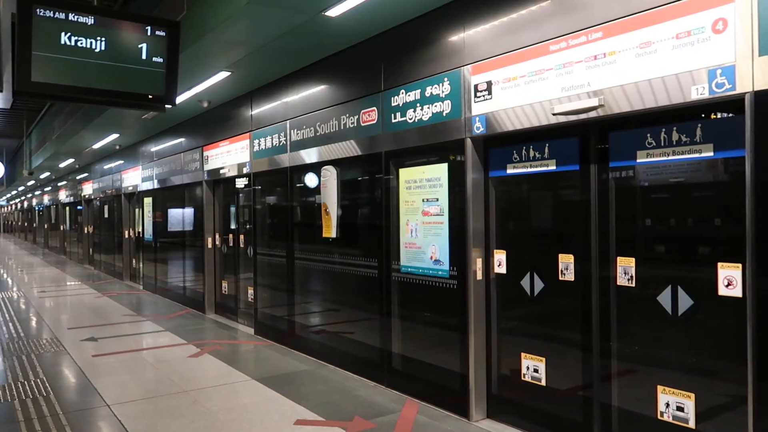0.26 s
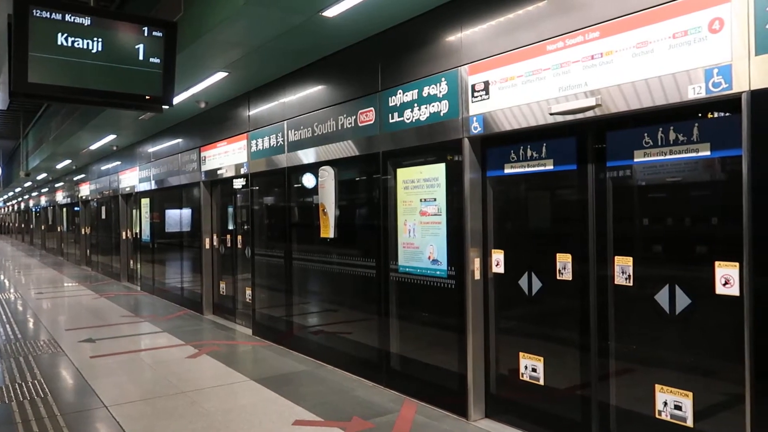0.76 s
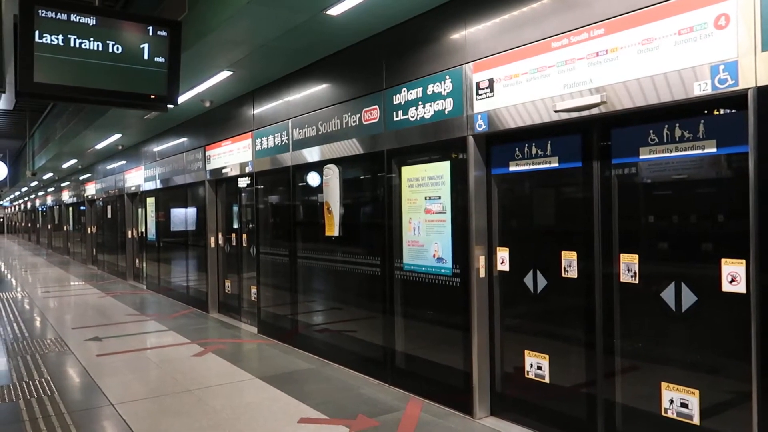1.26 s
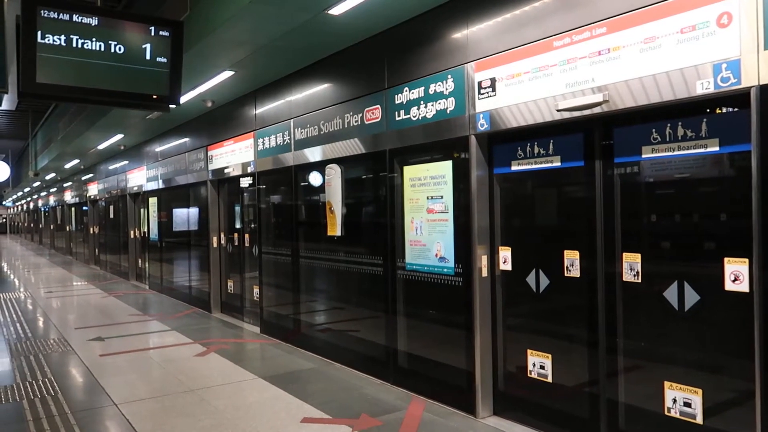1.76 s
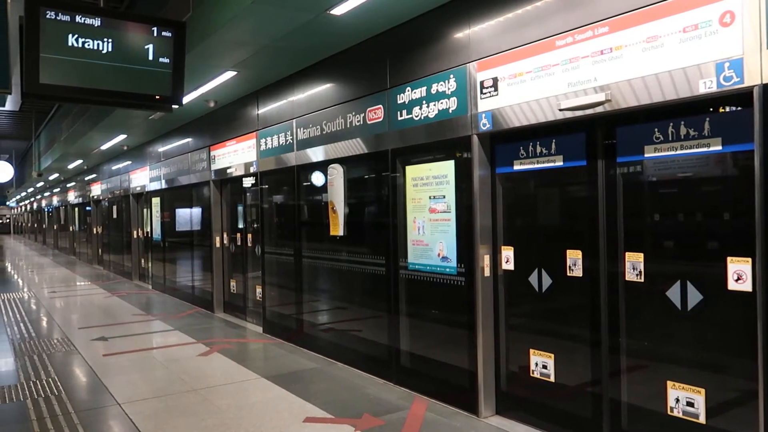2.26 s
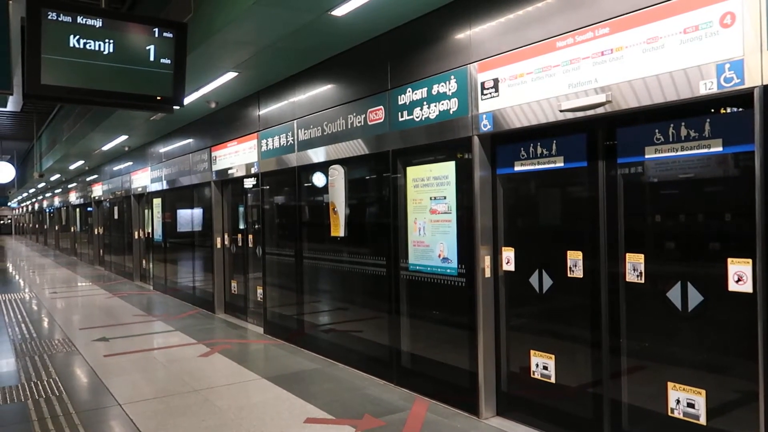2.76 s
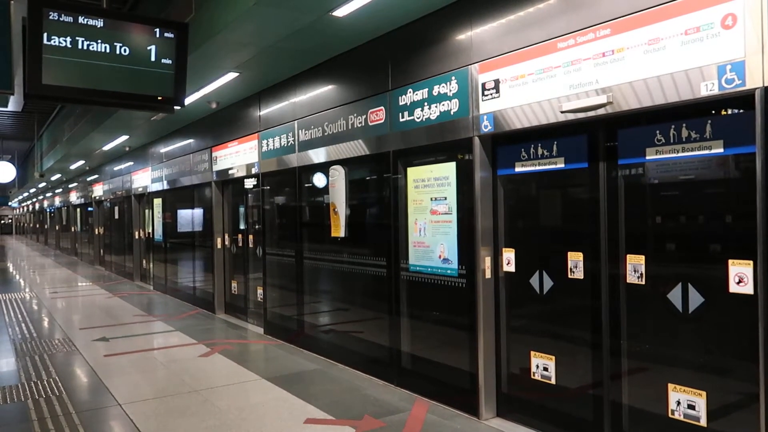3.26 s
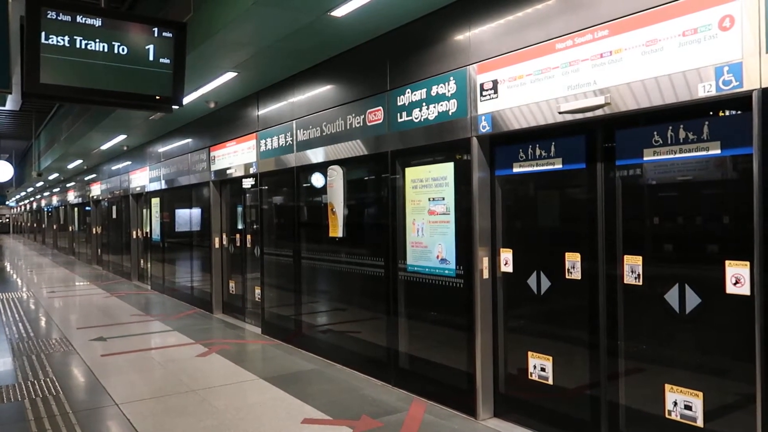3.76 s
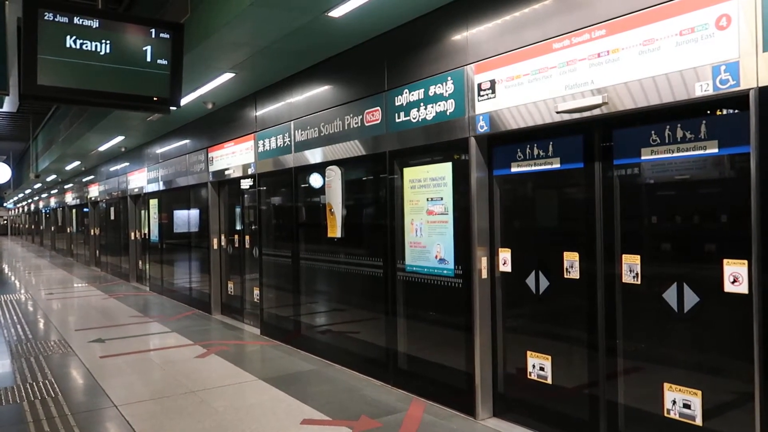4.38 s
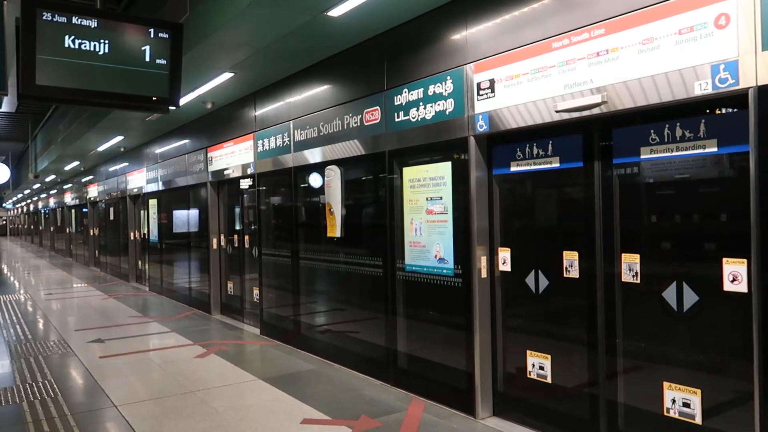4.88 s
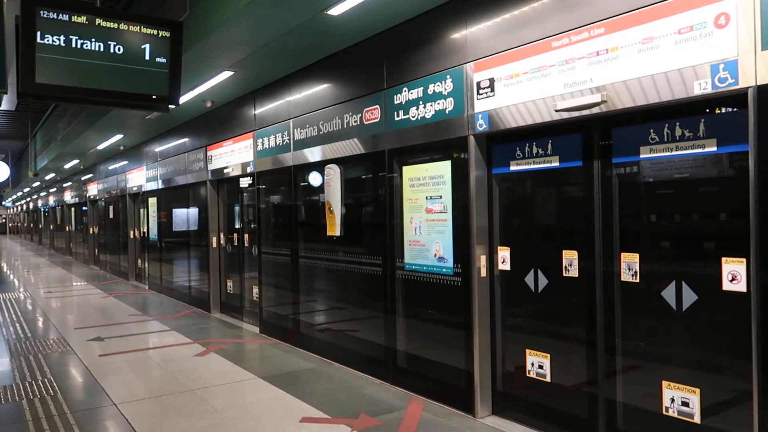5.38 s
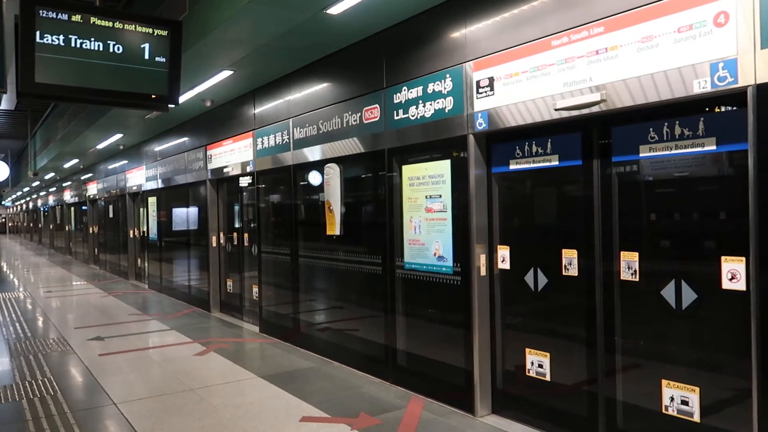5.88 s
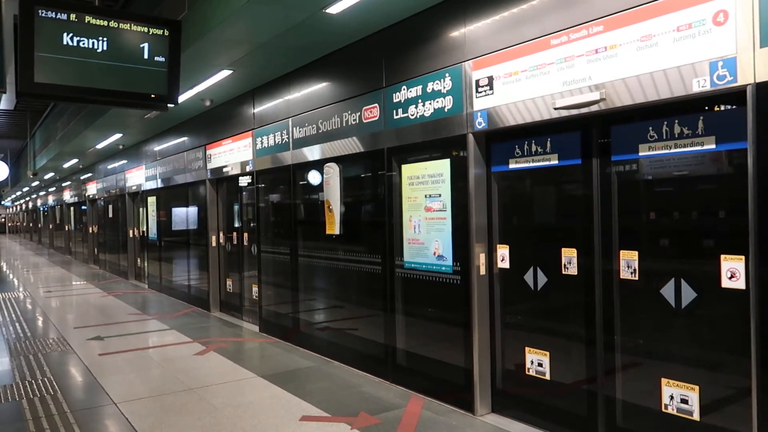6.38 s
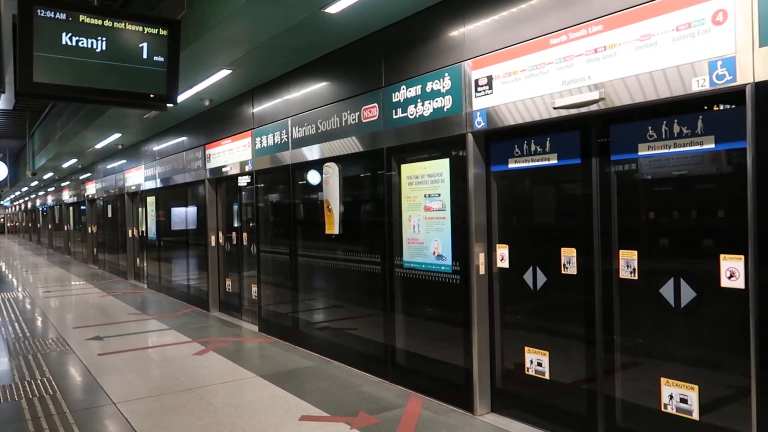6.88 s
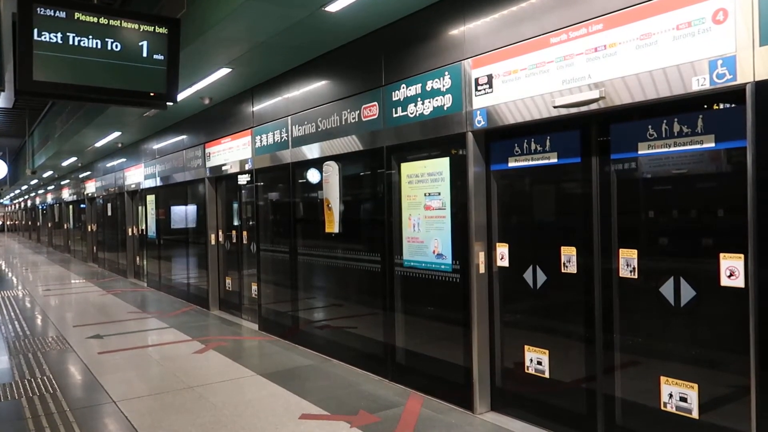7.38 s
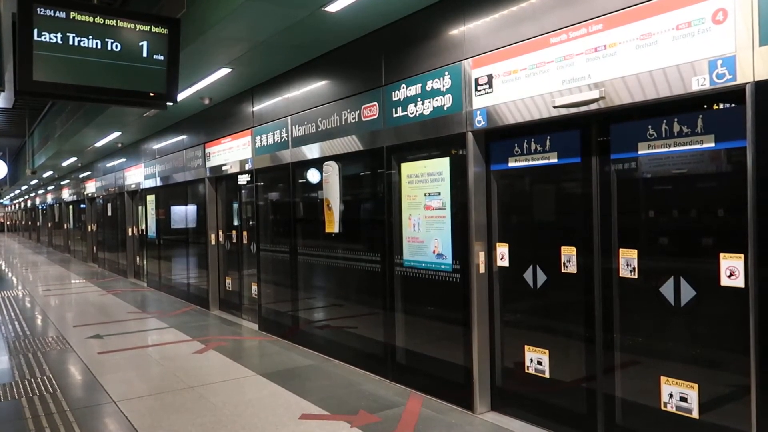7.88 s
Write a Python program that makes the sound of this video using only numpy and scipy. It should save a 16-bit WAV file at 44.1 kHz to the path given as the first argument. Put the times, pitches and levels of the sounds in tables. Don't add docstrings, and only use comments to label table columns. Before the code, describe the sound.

Low ventilation drone and soft hiss in a deserted subway station, while bass rumble from a far-off train swells and stays stronger.

```python
import sys
import numpy as np
from scipy import signal
from scipy.fft import rfft, irfft
from scipy.io import wavfile
from scipy.ndimage import uniform_filter1d

SR = 44100
rng = np.random.default_rng(int(sys.argv[2]) if len(sys.argv) > 2 else 0)


def wav_record(signal):
    frames = np.transpose(np.atleast_2d(signal))
    bounded = np.clip(frames, -1, 1)
    quanta = np.round(bounded * 32767).astype(np.int16)
    wavfile.write(sys.argv[1], SR, quanta)


def gain_from_db(level_db):
    decades = np.asarray(level_db, float) / 20
    return 10 ** decades


N = 358952
TIME = np.arange(N) / SR
HZ = np.maximum(np.fft.rfftfreq(N, 1 / SR), 1)


def level(x, db):
    return x * gain_from_db(db) / np.sqrt(np.mean(x ** 2))


def along(table, column=1):
    table = np.array(table)
    return np.interp(np.log(HZ), np.log(table[:, 0]), table[:, column])


def colour(spectrum, peaks=()):
    db = along(spectrum)
    for hz, width, lift in peaks:
        db = db + lift / (1 + (2 * (HZ - hz) / width) ** 2)
    return gain_from_db(db) * (HZ > spectrum[0][0]) * (HZ < spectrum[-1][0])


def white():
    return rfft(rng.standard_normal(N))


def bump(centre_s, length_s):
    return np.exp(-((TIME - centre_s) / length_s) ** 2)


def walk(rate):
    hold = int(SR / rate)
    steps = np.repeat(rng.standard_normal(N // hold + 1), hold)
    return 1.33 * uniform_filter1d(uniform_filter1d(steps, hold), hold)[:N]


def fans():
    # [(multiple, mid level/dB, side level/dB)]
    blades = [(353.55, .12, [(1, -50, -65), (2, -48.5, -75), (3, -59, -73)]), (356.94, .04, [(1, -50, -60),
              (2, -49, -84), (3, -54, -76), (4, -62, -86)]), (370.6, .15, [(1, -37.5, -64), (2, -49, -82)]),
              (376.05, .3, [(2, -51, -87), (3, -58, -74), (4, -64, -75)]), (305.26, .05, [(1, -45, -75)]),
              (459.14, .05, [(1, -51, -73)]), (596.84, .05, [(1, -51, -70)]),
              (11450.3, .3, [(1, -107, -90)])]
    # fan index, t/s, length/s, lift/dB
    passing_peak = (1, .6, .3, 14)
    peak_fan, peak_s, peak_length_s, peak_lift_db = passing_peak
    out = np.zeros((2, N))
    for fan, (blade_hz, wander_hz, tones) in enumerate(blades):
        rotation = 2 * np.pi * np.cumsum(blade_hz + wander_hz * walk(rate=1) / 2) / SR
        for multiple, mid_db, side_db in tones:
            phase = multiple * rotation + 2 * np.pi * rng.random()
            swell = np.sqrt(2) * gain_from_db(walk(rate=2.76))
            if fan == peak_fan and multiple == 1:
                mid_db = mid_db + peak_lift_db * bump(peak_s, peak_length_s)
            mid = gain_from_db(mid_db) * np.sin(phase)
            side = gain_from_db(side_db) * np.sin(phase + .4)
            out += swell * np.array([mid, side])
    return out


def extractor():
    # t/s, length/s, depth/dB
    dips = [(.76, .16, -9), (2.0, .1, -12), (3.52, .14, -16), (5.0, .09, -7), (5.9, .15, -9)]
    hum_hz, hum_db, side_db = 242.29, -30.8, -33
    dip_db = sum(db * bump(s, length) for s, length, db in dips)
    hum = np.sqrt(2) * gain_from_db(hum_db + dip_db) * np.sin(2 * np.pi * hum_hz * TIME)
    return np.array([hum, gain_from_db(side_db) * hum])


def air():
    # f/Hz, density/dB per Hz
    mid_air = [(20, -19), (60, -7.5), (110, -1.5), (300, -6.5), (325, -2.5), (550, -10.5), (1000, -18.5),
               (1600, -23), (2200, -27), (3300, -32), (5000, -43), (7000, -47.5), (9800, -55.5),
               (12000, -64), (13300, -64.3), (14500, -67), (15500, -71.5)]
    # f/Hz, density/dB per Hz
    side_air = [(150, -2), (330, -2), (520, -7), (1350, -9), (2300, -11), (3300, -13.5), (5000, -18.5),
                (7000, -22.5), (10500, -26.5), (12000, -32.5), (13500, -37), (15500, -47)]
    # f/Hz, width/Hz, lift/dB
    ducts = [(657, 34, 1.5), (716, 173, 5.5), (899, 100, 2.5), (1120, 33, -3.5), (1301, 65, 5),
             (1431, 100, 5), (1778, 234, 7), (2244, 130, 3), (2920, 590, 2.5), (3220, 250, 1),
             (4314, 180, 6), (4940, 250, 5), (5400, 170, 4.5), (6700, 260, -0.5), (8450, 570, 3),
             (9440, 570, 3)]
    # f/Hz, width/Hz, lift/dB
    side_ducts = [(610, 80, 3), (1070, 120, 4), (1700, 300, 5), (2750, 300, 2), (4200, 600, 2)]
    # f/Hz, share/0-1, lead/rad
    leftward = [(250, .3, 0.046), (600, .5, .1), (850, .3, .3), (1100, .55, .4), (1350, .4, .55),
                (1750, .7, .7), (2200, .45, .8), (3200, .45, 1.1), (6000, .35, 1.3), (10000, .1, 1.4)]
    common = white()
    share = np.clip(along(leftward), 0, 1)
    following = share * np.exp(1j * along(leftward, column=2)) * common
    apart = following + np.sqrt(1 - share ** 2) * white()
    mid = level(irfft(colour(mid_air, ducts) * common, N), -28.5)
    side = level(irfft(colour(side_air, side_ducts) * apart, N), -49)
    spectrum = rfft(np.array([mid, side]))
    half_octave = 2 * np.log2(HZ / 20)
    out = np.zeros((2, N))
    for band in range(21):
        window = np.clip(1 - np.abs(half_octave - band), 0, 1)
        out += irfft(spectrum * window, N) * gain_from_db(walk(rate=9) / 2)
    return out


def rolling(gain, db):
    even = int(0.35 * SR)
    noise = irfft(gain * white(), N)
    power = uniform_filter1d(uniform_filter1d(noise ** 2, even), even)
    return level(noise / np.sqrt(power), 0) * gain_from_db(db)


def train():
    # f/Hz, density/dB per Hz
    boom = [(25, -20), (40, -11), (55, -6), (68, -4), (80, -10.5), (110, -13), (140, -31)]
    # f/Hz, width/Hz, lift/dB
    boom_mode = [(71.6, 14, 4.5)]
    # f/Hz, density/dB per Hz
    rumble = [(90, -16), (130, -8), (170, -4), (200, 0), (230, -0.5), (250, -9), (290, -24)]
    # f/Hz, density/dB per Hz
    drumming = [(200, -20), (235, -1.5), (260, 0.5), (305, 0), (320, -15), (420, -24.5)]
    # t/s, length/s, boom lift/dB, track bed lift/dB, door lift/dB
    surges = [(.17, 0.15, -1, 3, 1), (1.1, 0.15, 2.5, 0, 3), (1.7, .2, 0, 1.5, -1.5),
              (2.397, .12, -2, 0, 1.5), (2.647, 0.2, 1.5, 4, -1.5), (3.0, .17, 0, 3.5, 1),
              (4.2, .18, 3.5, 2, 2), (4.635, 0.19, -0.5, 7, -0.5), (4.903, .12, 3, 1.5, 2.5),
              (5.35, 0.13, 2, 0, 0), (5.7, 0.22, 1, 2.5, 1.5), (6.053, 0.11, -5, 1.5, 3),
              (6.35, 0.29, 2.5, 5.5, 3), (6.952, 0.093, 0, 3, 0), (7.25, .15, -1, 0, -1.5),
              (7.65, 0.23, 0.5, 3.5, -1.5), (7.947, .15, 3, 1.5, 3.5)]
    nearness = (1 + np.tanh((TIME - 2.53) / 0.46)) / 2
    boom_wave, rumble_wave, drum_wave = sum(np.outer(lifts, bump(s, length)) for s, length, *lifts in surges)
    boom_db = -34 + 3.3 * nearness + boom_wave
    rumble_db = -32.5 + 4.78 * nearness + rumble_wave
    drum_db = -34.5 + 4.4 * nearness + drum_wave
    mid = rolling(colour(rumble), rumble_db) + rolling(colour(drumming), drum_db)
    side = rolling(colour(rumble), rumble_db) + rolling(colour(drumming), drum_db)
    tunnel = rolling(colour(boom, boom_mode), boom_db)
    return np.array([tunnel + mid, gain_from_db(-25) * (side + .3 * mid)])


def leak():
    # f/Hz, density/dB per Hz
    hiss = [(4500, -14), (6500, -1), (9000, -5), (11300, -6), (12000, -18)]
    hold_s, fade_s = 1.0, 1.0
    fade = np.exp(-np.maximum(TIME - hold_s, 0) / fade_s)
    mid = level(irfft(colour(hiss) * white(), N), -70.5)
    side = level(irfft(colour(hiss) * white(), N), -70)
    return fade * np.array([mid, side])


def ticks():
    # t/s, peak level/dB
    pushes = [(2.9098, -34.5)]
    # f/Hz, level/dB, t60/s
    modes = [(3900, 0, .007), (6500, 0, .005)]
    t = TIME[:SR // 20]
    ring = sum(gain_from_db(db - 60 * t / t60) * np.sin(2 * np.pi * hz * t) for hz, db, t60 in modes)
    ring = ring * np.minimum(t / .0006, 1)
    out = np.zeros(N)
    for s, db in pushes:
        start = int(s * SR)
        out[start:start + len(t)] += gain_from_db(db) * ring
    return np.array([out, .8 * out])


def scene():
    mid, side = fans() + extractor() + air() + train() + leak() + ticks()
    return np.array([mid + side, mid - side])


def roll_off(x):
    return signal.sosfilt(signal.butter(12, 15170, fs=SR, output="sos"), x)


def record(dry):
    side_cut_hz = 248
    mid, side = (dry[0] + dry[1]) / 2, (dry[0] - dry[1]) / 2
    side = irfft(rfft(side) / np.sqrt(1 + (side_cut_hz / HZ) ** 11), N)
    return roll_off(np.array([mid + side, mid - side]))


dry = scene()
out = record(dry)
wav_record(out)
```